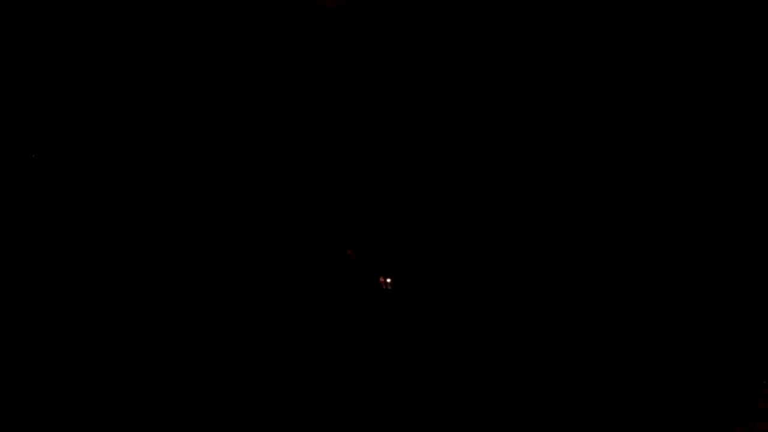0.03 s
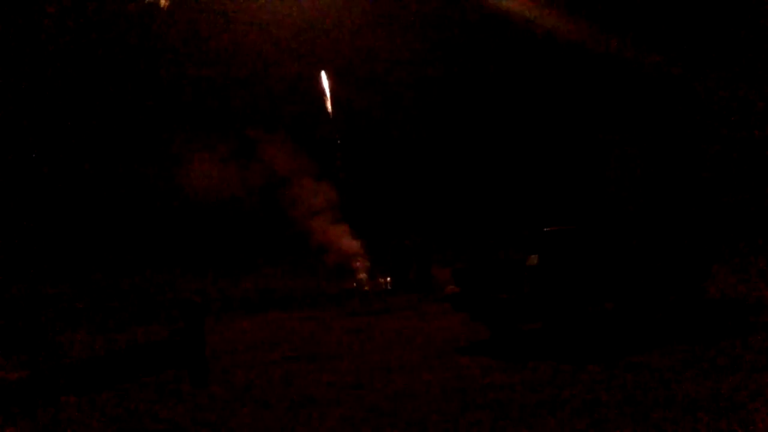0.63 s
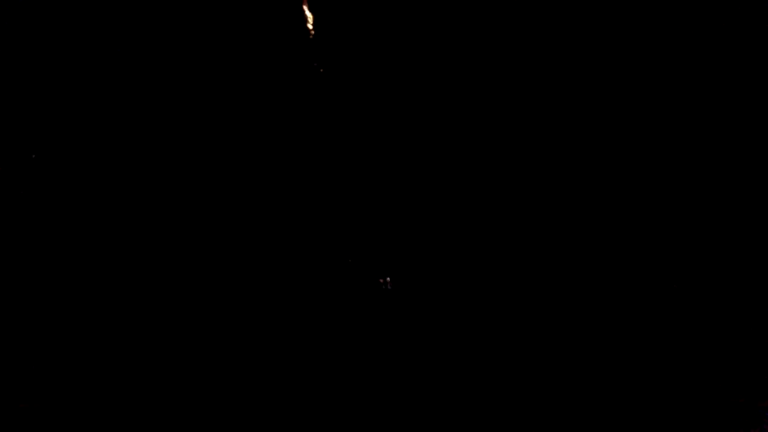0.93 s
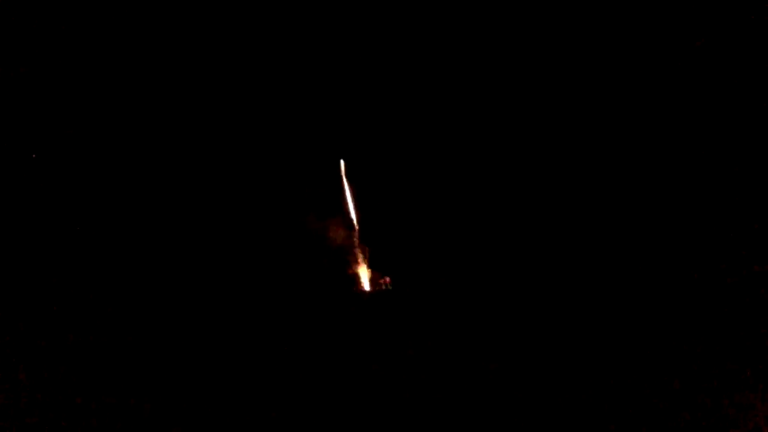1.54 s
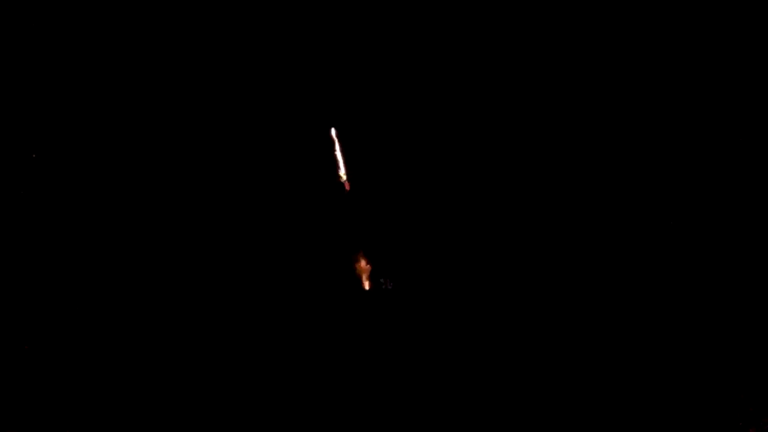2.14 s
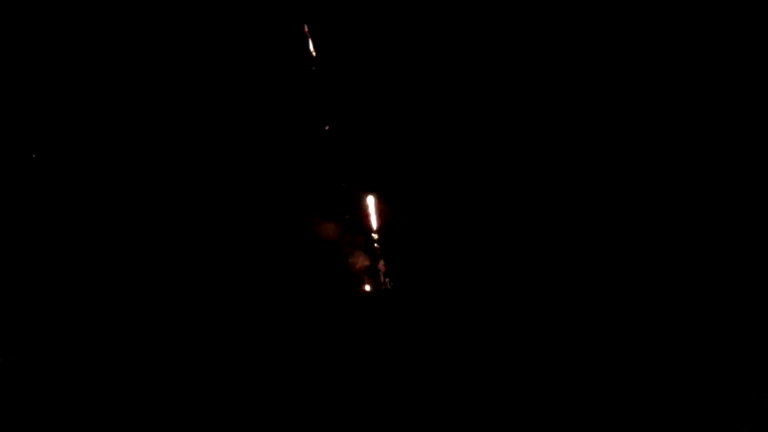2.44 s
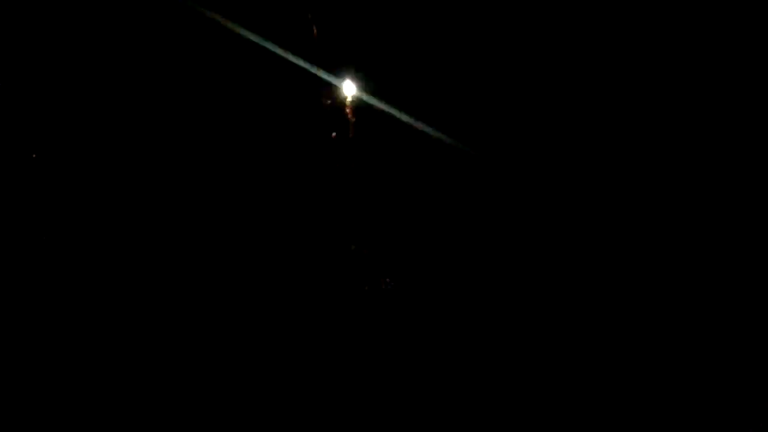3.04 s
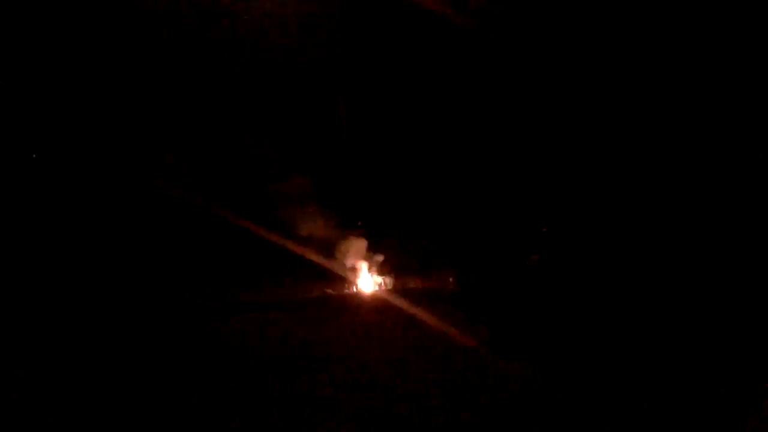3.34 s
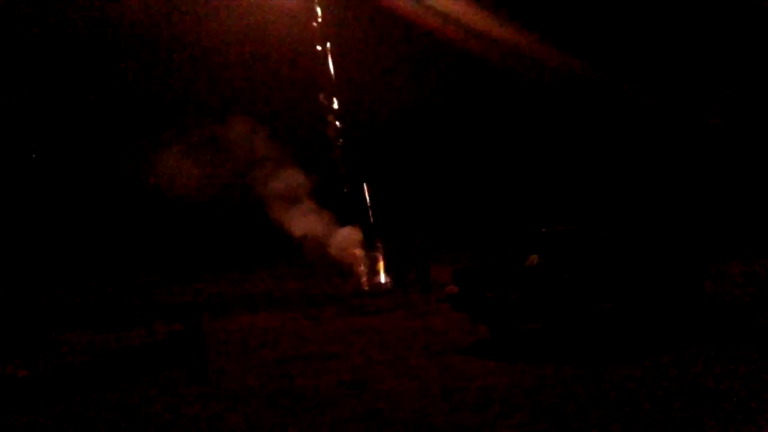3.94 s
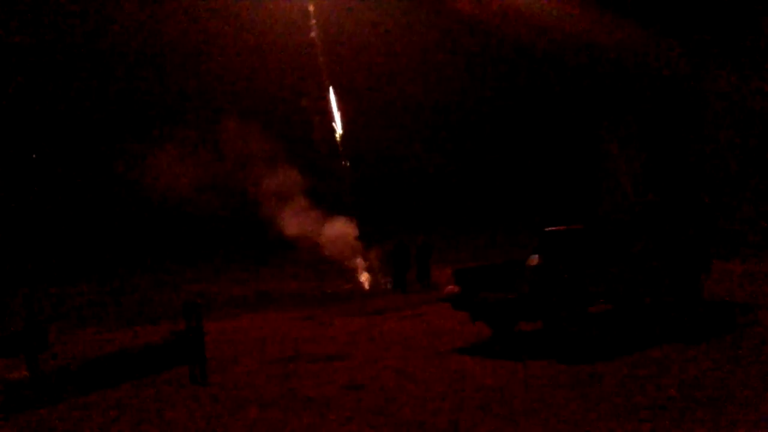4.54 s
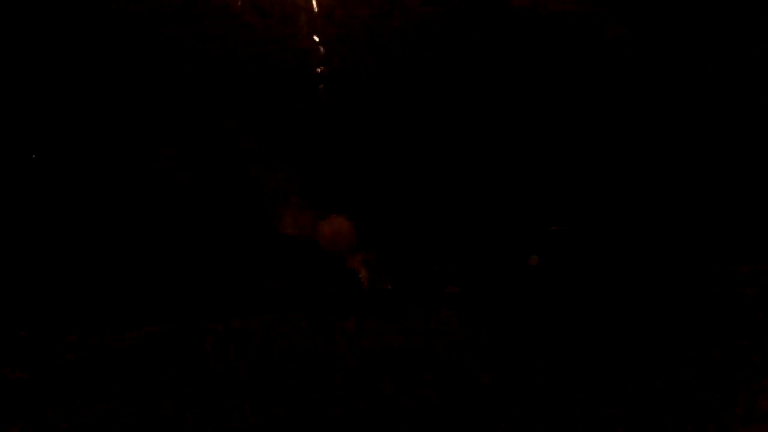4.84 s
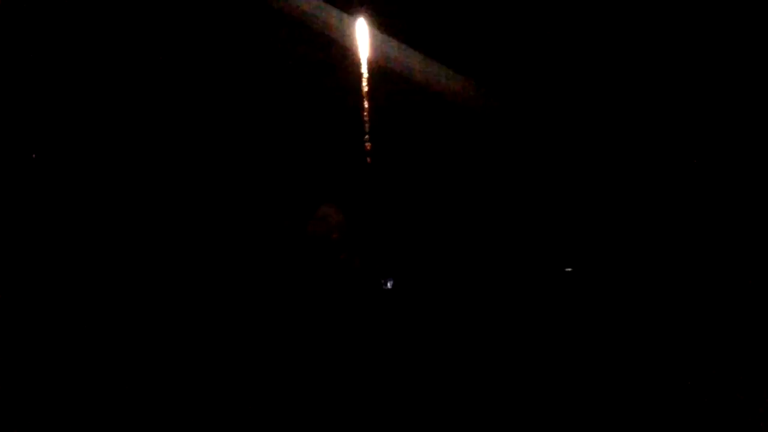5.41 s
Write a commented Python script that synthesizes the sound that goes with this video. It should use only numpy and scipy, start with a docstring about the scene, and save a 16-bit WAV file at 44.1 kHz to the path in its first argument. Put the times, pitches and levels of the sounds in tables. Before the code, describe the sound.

Clusters of sharp firework crackles alternate with hollow launch thumps and faint falling swishes, outdoors with short echoes.

```python
"""Sharp snaps crackle in the night air as a firework cake fires comets over an open field.
Each snap is a star's tiny shock, doubled by the ground; a few stars flare with a rasp or fizz with sparks.
Each launch thumps in its cardboard tube, and the comet swishes away, sinking in pitch.
Nearby ground clutter and a far line of trees scatter the bangs back; insects sing faintly."""
import sys
import numpy as np
from scipy import signal
from scipy.fft import rfft, irfft
from scipy.io import wavfile

SR = 44100
rng = np.random.default_rng(int(sys.argv[2]) if len(sys.argv) > 2 else 0)


def generate_wav(sig):
    """Save sig (samples, or channels by samples) to the path in sys.argv[1] as 16-bit PCM at SR."""
    pcm = np.round(np.clip(np.atleast_2d(sig).T, -1, 1) * 32767).astype(np.int16)
    wavfile.write(sys.argv[1], SR, pcm)


N = 245637
TOP_HZ = 16000

# snaps of the crackling stars: t/s, level/dB, treble/dB
STAR_SNAPS = [(0.2255, -9, 1.0), (0.341, -17.5, 8.5), (0.3442, -21, 8), (0.3815, -0.5, 3),
              (0.4104, -2.5, 2.5), (0.4913, -16.5, 4), (0.4955, -6.5, 5), (0.5027, -1, -5),
              (0.5278, -16, -9.5), (0.5983, -25, 3), (0.6411, -20, 1.5), (1.1791, -17, 0),
              (1.1994, -3.5, -3), (1.2336, -5.5, 6.5), (1.2974, 3.0, 0.5), (1.326, -0.5, 2),
              (1.407, -6.5, -1.5), (1.411, -3, -3.5), (1.441, 0.5, 0), (1.5035, 0.0, 5.5),
              (1.5313, -5.5, 1.5), (2.1992, -6, 4.5), (2.248, -9.5, 0), (2.2591, -3, 4.5),
              (2.2746, -3.0, -4), (2.2822, -18.5, -13), (2.3125, -14, -6), (2.3825, -13, -11),
              (2.4357, 3.5, 1.5), (2.5084, -3.5, 5), (2.553, -3.5, 3), (2.5654, 2, 3), (2.659, 2.0, 2.0),
              (3.0896, -11.5, -2.5), (3.1096, -10, 2), (3.1554, -7, 6), (3.2643, -7, 0),
              (3.2812, -7.5, 3.5), (3.3156, 1.5, -4), (3.344, 1, -1), (3.3597, -3.5, 6), (3.3842, 2.0, 0),
              (3.3909, -16, -3), (3.4405, 3, -8.5), (3.4468, -1, -2.5), (3.4623, -4.5, -2),
              (3.7352, -10, 6), (3.7715, -10, 3), (3.7861, -4.0, 3), (3.7964, 0.5, 1.5),
              (3.8112, -10.5, -12.5), (3.8216, -10, -15), (3.8658, 2.5, 2.5), (3.9464, -4.5, -2.5),
              (3.9605, 2, 5.5), (3.9799, 2, 1), (3.9831, -4.0, -1), (4.0482, -1.5, -0.5),
              (4.0798, -17, 5.5), (4.0848, -11.5, 1.5), (4.477, -7, 0), (4.5379, -13.5, 1),
              (4.6015, -1.0, 1), (4.6066, -8.5, 1.0), (4.6243, 1.5, 5.5), (4.6447, -9, -1),
              (4.701, -13.5, -4.5), (4.8055, -16, -1), (4.8814, -5, 4.5), (4.8891, -9.5, 4.5),
              (5.0213, -2, 1), (5.1245, -5, -15), (5.1516, -4, 4.5), (5.2613, -9, -5.5), (5.2649, -17, 1),
              (5.2747, -7.5, -8), (5.2931, -16, -10), (5.3282, -0.5, 0), (5.3346, 0, -0.5),
              (5.3405, -7, -2.0), (5.3643, 0, 2.0), (5.3872, -11.5, 8), (5.394, 0.5, -3.0),
              (5.3962, -6.5, -7.0), (5.4189, -2.5, 0), (5.4286, -2, -3.0), (5.4494, -8, -2),
              (5.4561, -5.5, 1), (5.4813, -8, -5), (5.4866, -3, -3), (5.5003, -4, 5), (5.5276, -1, 1.0),
              (5.5577, 2, 3.0), (5.568, -13, 6)]
# comet launches: t/s, thump level/dB, treble/dB, swish level/dB, nominal top edge of the swish/Hz
COMET_SHOTS = [(0.4172, -2, -2.5, -44.5, 7250), (1.4596, 0, 6.5, -42.5, 6400), (2.037, -2, -7, -49, 6040),
               (2.544, -2, -6, -43.5, 7460), (3.4314, -2.5, -8, -45.5, 7300),
               (3.6096, -2, -12, -51.5, 6700), (4.3967, -1.5, -8, -44, 8400)]


def crackle(snaps, bounce=.55, second_bounce=.13, wall_s=.0051, wall_db=-13.0, wall_hz=2420.0):
    """Each star is one tiny shock; the ground repeats it at once, something nearby once more, duller."""
    # pressure spectrum of one snap: f/Hz, level/dB
    snap_spectrum = [(20, -66), (60, -33.5), (150, -10.5), (400, 6.5), (800, 7), (1500, 8.5), (2300, 7),
                     (3300, 11.5), (4600, 10), (6500, 5.5), (8000, -0.5), (10000, -10), (15000, -23)]
    # lag of the ground bounce, following the stars' place in the sky: t/s, lag/ms
    bounce_lags = [(.3, .64), (1.3, 0.62), (2.5, 0.62), (3.2, .57), (3.9, 0.606), (4.8, 0.64), (5.5, 0.62)]
    out, radiated = np.zeros(N), np.zeros(N)
    for s, db, treble_db in snaps:
        lag_ms = np.interp(s, *np.transpose(bounce_lags)) + .018 * rng.standard_normal()
        hz, pulse = shock(snap_spectrum, treble_db)
        delay = np.exp(-2j * np.pi * hz * lag_ms / 1000)
        ground = delay * (bounce + delay * second_bounce)
        wall_delay = np.exp(-2j * np.pi * hz * wall_s * rng.uniform(.94, 1.06))
        wall = undb(wall_db) * wall_delay / (1 + 1j * hz / wall_hz)
        add(out, s, undb(db) * irfft(pulse * (1 + ground + wall)))
        add(radiated, s, undb(db) * irfft(pulse))
    return out + field_echoes(radiated, clutter_db=3.5, trees_db=1.5)


def launches(rumble_db=-31.5, rumble_t60=0.21, blast_db=-18.5, blast_t60=0.014):
    """The lift charge thumps out of the tube with a blast of gas; a short rumble runs along the ground."""
    # spectra of the tube's thump, the gas blast and the ground rumble: f/Hz, level/dB
    thump_spectrum = [(15, -27.5), (45, -10.5), (85, 12), (125, 20.5), (220, 23), (325, 29), (450, 21),
                      (600, 18.5), (780, 5), (1000, 15.5), (1500, 4), (5000, 3.5), (10000, -15.5),
                      (15000, -35)]
    blast_spectrum = [(200, -17), (700, -6), (1100, -3.5), (1900, -4.5), (3000, 3.5), (4400, 0.5),
                      (6000, -5), (9000, -8.5), (15000, -27.5)]
    rumble_spectrum = [(20, -49), (60, -20.5), (110, 3), (330, 2), (600, -5.5), (1200, -15), (4000, -34.5),
                       (12000, -57)]
    out, t = np.zeros(N), np.arange(SR // 2) / SR
    for s, db, treble_db, _, _ in COMET_SHOTS:
        _, thump = shock(thump_spectrum, treble_db, shelf_hz=3140.0)
        add(out, s, undb(db) * irfft(thump))
        blast = level(colour(rng.standard_normal(len(t)), blast_spectrum), db + blast_db + treble_db / 2)
        rumble = level(colour(rng.standard_normal(len(t)), rumble_spectrum), db + rumble_db)
        add(out, s, blast * undb(-60 * t / blast_t60) + rumble * undb(-60 * t / rumble_t60))
    return out + field_echoes(out, clutter_db=3.0, trees_db=5.5)


def swishes(low_hz=900., flutter_db=3.0, ridge_gain=.3, ridge_width=.08):
    """Each comet rushes upwards; its hiss flutters and sinks in pitch as it recedes."""
    out = np.zeros(N)
    for s, _, _, db, muzzle_hz in COMET_SHOTS:
        hz, t, noise = signal.stft(rng.standard_normal(SR * 6 // 10), SR, nperseg=512)
        edge_hz, gain = climb(t, muzzle_hz)
        hz = hz[:, None]
        ratio = hz / (edge_hz * rng.uniform(0.81, 0.94))
        low_cut = hz / np.hypot(hz, low_hz)
        body = low_cut / np.sqrt(1 + ratio ** 14)
        # two narrow ridges: at the top edge and an octave below
        ridges = ridge_gain * sum(np.exp(-((k * ratio - 1) / ridge_width) ** 2) for k in (1, 2))
        flutter = undb(flutter_db * rng.standard_normal(len(t)))
        _, hiss = signal.istft(noise * (body + ridges) * gain * flutter, SR)
        early_rms = np.std(hiss[SR // 10:SR // 4])
        add(out, s, hiss * undb(db) / early_rms)
    return out


def climb(t, muzzle_hz, ignite_s=0.078, attack_s=0.017, burnout_s=0.3, octave_down_s=0.35):
    """Top edge and gain of a comet's hiss: it lights after launch, dulls with distance and burns out."""
    edge_hz = muzzle_hz / (1 + (t / octave_down_s) ** 2.6)
    lit = np.clip((t - ignite_s) / attack_s, 0, 1)
    fade_db = -41 * t - 125 * np.maximum(t - burnout_s, 0)
    return edge_hz, lit * undb(fade_db)


def flares():
    """Powder catches over a few milliseconds: a soft low puff with a bright rasp."""
    # stars flaring up: t/s, level/dB, length/s
    flare_ups = [(2.319, -32, 0.017), (3.911, -23, 0.01), (5.1095, -23, 0.009)]
    # spectrum of the puff and rasp: f/Hz, level/dB
    rasp_spectrum = [(25, -36.5), (110, 7.5), (300, 8.5), (700, 0), (2000, -0.5), (4000, 9), (7000, 7),
                     (10000, -4.5), (15000, -14.5)]
    out, t = np.zeros(N), np.arange(SR // 10) / SR
    for s, db, length in flare_ups:
        swell = np.exp(-(2 * t / length - 1) ** 2)
        add(out, s, swell * level(colour(rng.standard_normal(len(t)), rasp_spectrum), db))
    return out + field_echoes(out, clutter_db=1.0, trees_db=-3.0)


def fizzes():
    """A burning star spits a dense run of tiny sparks that starts quickly and dies away."""
    # fizzing stars: t/s, level before the envelope/dB, nominal length/s
    spark_runs = [(3.128, -36.5, 0.064), (3.246, -39.5, 0.014), (4.8, -60, 0.049), (5.256, -40.5, .03)]
    # spectrum of the sparks: f/Hz, level/dB
    spark_spectrum = [(100, -13.5), (700, -2.5), (1500, 3), (3200, 1), (6000, -0.5), (8000, -7),
                      (14000, -37)]
    out, t = np.zeros(N), np.arange(SR // 4) / SR
    for s, db, length in spark_runs:
        sparks = rng.standard_normal(len(t)) * undb(5 * rng.standard_normal(len(t)))
        burn = np.interp(t / length, [0, .1, .8, 1.4], [0.48, 0.79, 0.61, 0])
        add(out, s, burn * level(colour(sparks, spark_spectrum), db))
    return out + field_echoes(out, clutter_db=-3.5, trees_db=-8.5)


def crumbs(share=0.52, max_wait_s=0.049, drop_db=25):
    """Some stars shed a crumb that pops a moment later, weaker and sharper."""
    luck, wait = rng.random((len(STAR_SNAPS), 2)).T
    size, sharpness = rng.standard_normal((len(STAR_SNAPS), 2)).T
    star_s, star_db, _ = np.transpose(STAR_SNAPS)
    db = star_db - drop_db + 5 * size
    treble_db = 6.5 + 3.5 * sharpness
    pops = np.column_stack([star_s + max_wait_s * wait, db, treble_db])
    return crackle(pops[luck < share])


def field_echoes(x, clutter_db, trees_db, bands=14, air_loss_db_per_s=1.08):
    """Countless small reflections off the field, duller the further they have travelled."""
    # spectrum of the scattered sound: f/Hz, level/dB
    scatter_spectrum = [(100, -25), (300, -13), (900, -2.5), (1800, -1.5), (4000, -4.5), (7000, 0),
                        (14000, 3)]
    t = np.arange(SR) / SR
    patches = np.interp(t, np.linspace(0, 1, 200), rng.standard_normal(200))
    twigs = level(rng.standard_normal(SR) * undb(3.5 * rng.standard_normal(SR) + 2.5 * patches), 0)
    spectrum = rfft(colour(twigs, scatter_spectrum))
    centres_hz = np.geomspace(800, TOP_HZ, bands)
    response = 0
    for hz, weights in zip(centres_hz, np.eye(bands)):
        band = irfft(spectrum * np.interp(bins(SR), centres_hz, weights))
        response += band * undb(-air_loss_db_per_s * t * (hz / 1000) ** 2)  # air eats the treble first
    envelope = echo_envelope(t, clutter_db, trees_db)
    return signal.fftconvolve(x, response * envelope / np.sqrt(SR))[:N]


def echo_envelope(t, clutter_db, trees_db, hold_s=0.027, trees_delay_s=0.14, trees_spread_s=0.05):
    """Clutter answers at once and dies fast; the trees answer in one swell, the land behind rolls on."""
    near = undb(2 - 286 * np.maximum(t - hold_s, 0))  # falls 286 dB/s after the hold
    late = t - trees_delay_s
    swell = np.exp(-(late / trees_spread_s) ** 2)
    roll = np.where(late < 0, swell, undb(-51 * late))
    far = undb(-12.5) * swell + undb(-13) * roll
    return undb(clutter_db) * near + undb(trees_db) * far


def night(air_db=-78, insect_db=-80.0, insect_hz=3400.0, width_hz=260):
    """A bed of still air, and a far chorus of insects wavering in one narrow band."""
    # spectrum of the night air: f/Hz, level/dB
    air_spectrum = [(25, -24), (60, -11), (120, -2.5), (330, -1), (650, -6), (1300, -1.5), (2200, -5.5),
                    (5000, -10), (8000, -11), (15000, -28)]
    insect_band = np.exp(-((bins(N) - insect_hz) / width_hz) ** 2 / 2)
    chorus = irfft(rfft(rng.standard_normal(N)) * insect_band, N)
    waver_db = np.interp(np.arange(N), np.linspace(0, N, 90), 1.2 * rng.standard_normal(90))
    air = colour(rng.standard_normal(N), air_spectrum)
    return level(air, air_db) + level(chorus * undb(waver_db), insect_db)


def shock(points, treble_db, shelf_hz=5300.0, size=2048):
    """Frequencies and spectrum of a sudden pressure pulse; a sharper front has more treble."""
    hz = bins(size)
    shelf = 1 - 1 / (1 + (hz / shelf_hz) ** 4)
    cepstrum = irfft(np.log(undb(shape_db(points, hz) + treble_db * shelf)))
    # minimum phase packs the energy into the attack
    cepstrum[1:size // 2] *= 2
    cepstrum[size // 2 + 1:] = 0
    return hz, np.exp(rfft(cepstrum))


def undb(db):
    """Decibels to gain."""
    return 10 ** (np.asarray(db) / 20)


def shape_db(points, hz):
    """Read an EQ curve on a log-frequency axis."""
    f, db = np.transpose(points)
    return np.interp(np.log(np.maximum(hz, 1)), np.log(f), db)


def bins(size):
    """Frequencies of a transform of this size."""
    return np.arange(size // 2 + 1) * SR / size


def colour(x, points):
    """Filter a sound by an EQ curve."""
    return irfft(rfft(x) * undb(shape_db(points, bins(len(x)))), len(x))


def level(x, db):
    """Set the rms level."""
    return x * undb(db) / np.std(x)


def add(out, s, x):
    """Mix a sound in at s seconds."""
    i = int(round(s * SR))
    out[i:i + len(x)] += x[:max(0, N - i)]


def scene(spots=6):
    """Mono mix; the stars burst at several spots in the sky, each spot with its own echoes."""
    stars = sum(crackle(STAR_SNAPS[k::spots]) for k in range(spots))
    return (stars + launches() + swishes() + flares() + fizzes() + night() + crumbs())[None]


def record(dry):
    """Peaks clip at full scale; the small microphone loses the deep bass and the top is cut."""
    low_cut = signal.butter(2, 72, "high", fs=SR, output="sos")
    high_cut = signal.ellip(10, .2, 90, TOP_HZ, fs=SR, output="sos")
    thin = signal.sosfilt(low_cut, np.clip(dry, -1, 1))
    return signal.sosfilt(high_cut, thin)


dry = scene()
out = record(dry)
generate_wav(out)
```